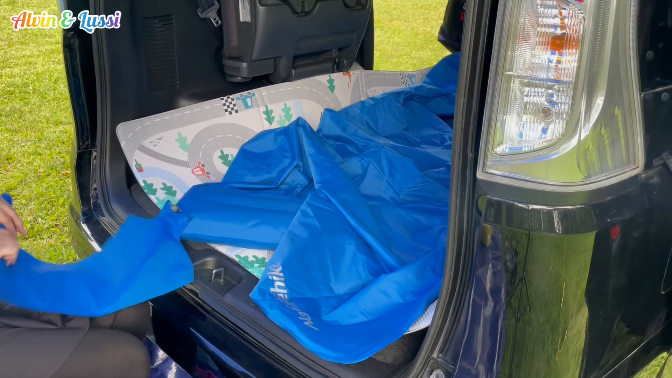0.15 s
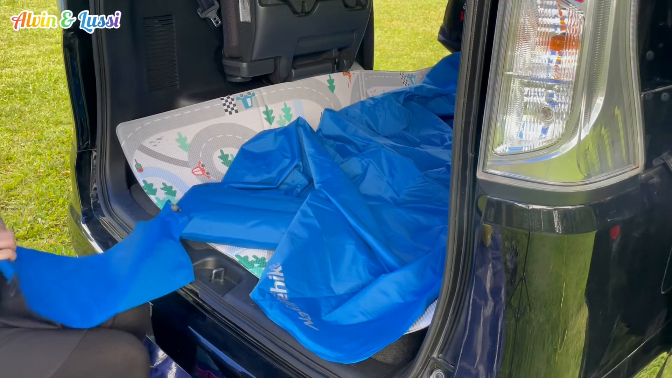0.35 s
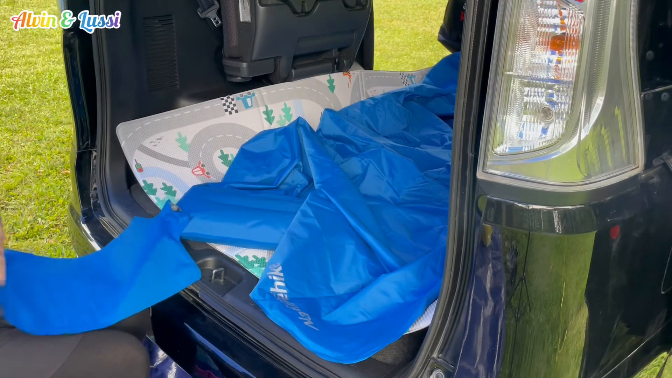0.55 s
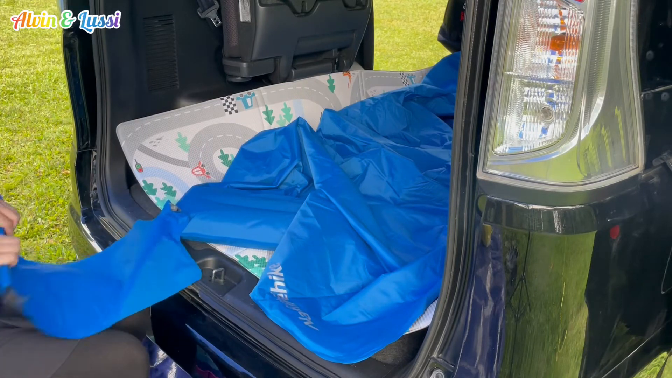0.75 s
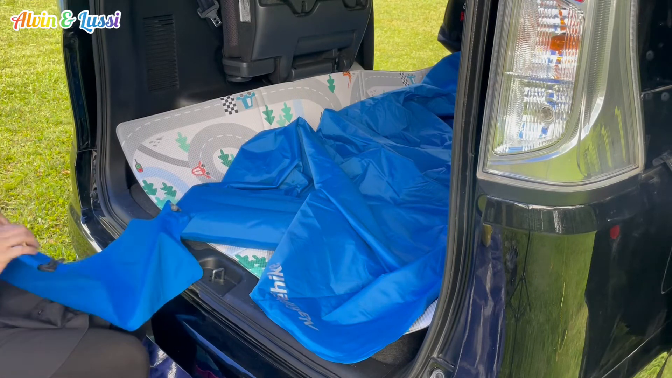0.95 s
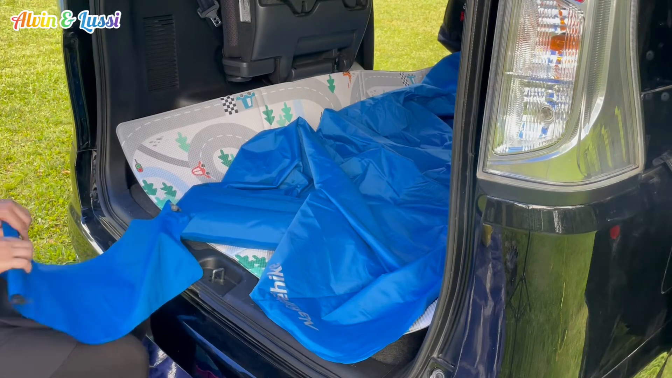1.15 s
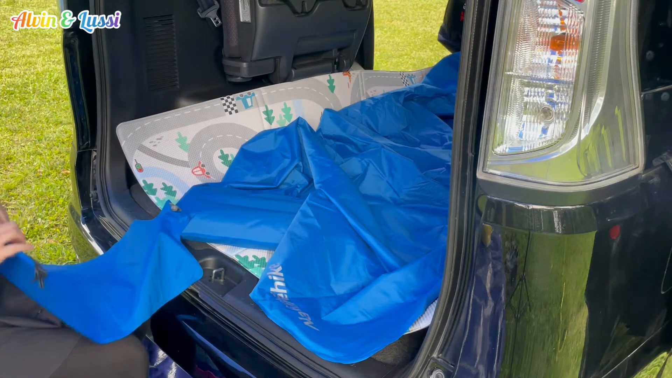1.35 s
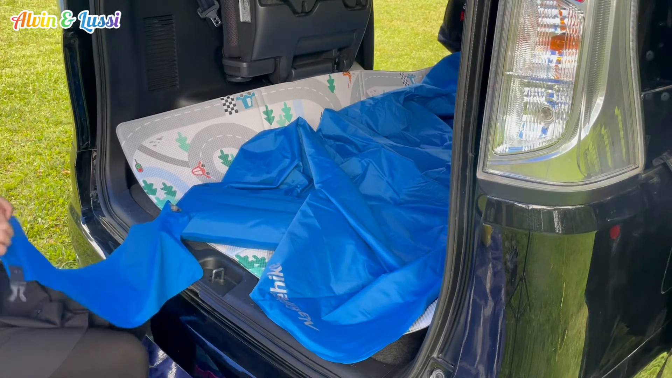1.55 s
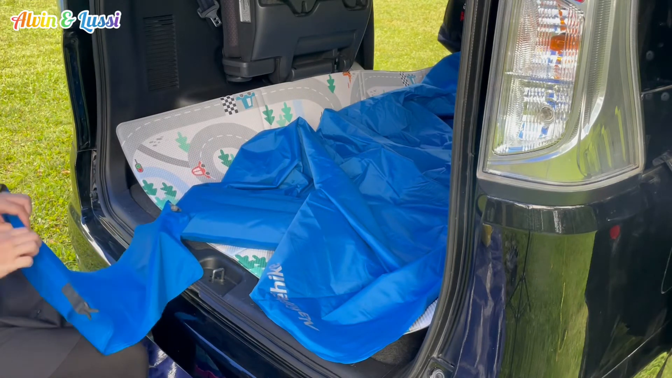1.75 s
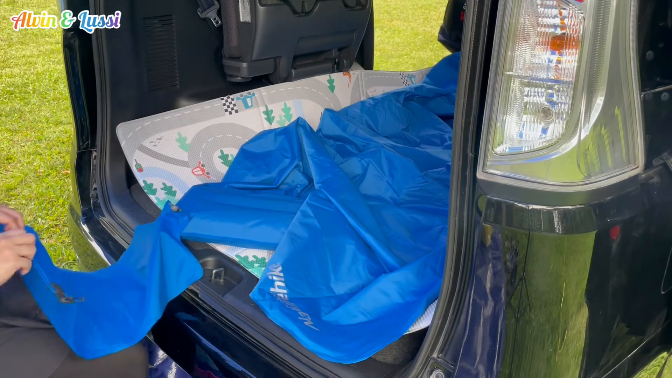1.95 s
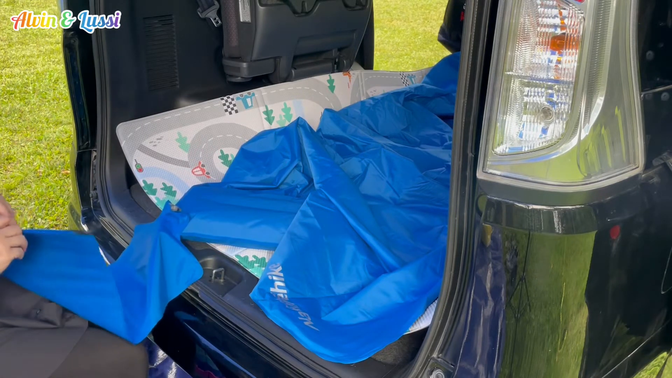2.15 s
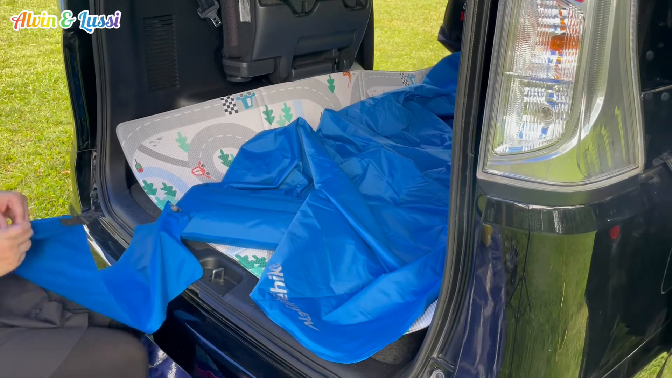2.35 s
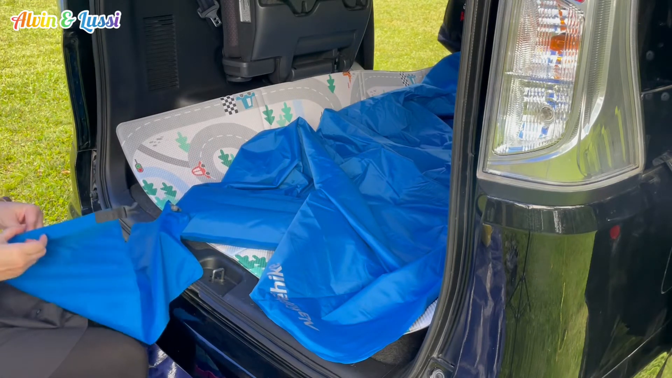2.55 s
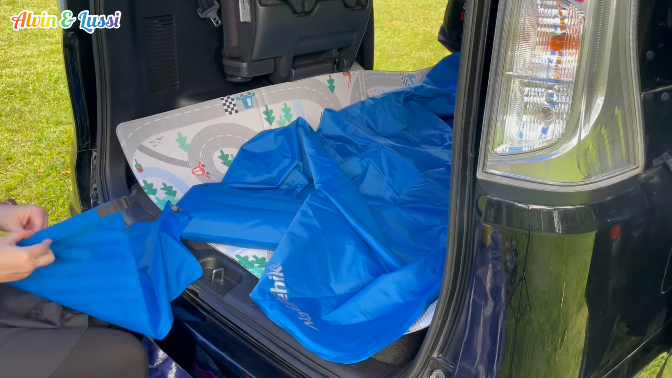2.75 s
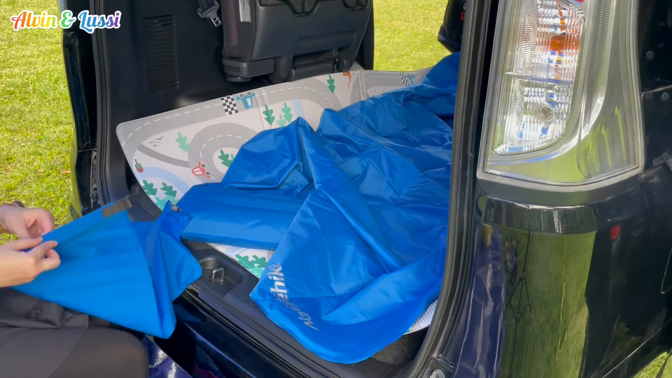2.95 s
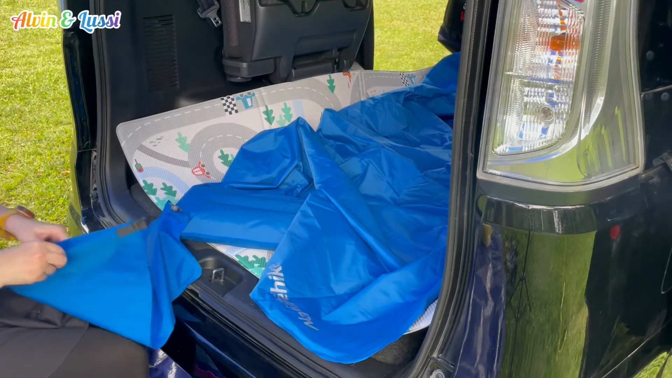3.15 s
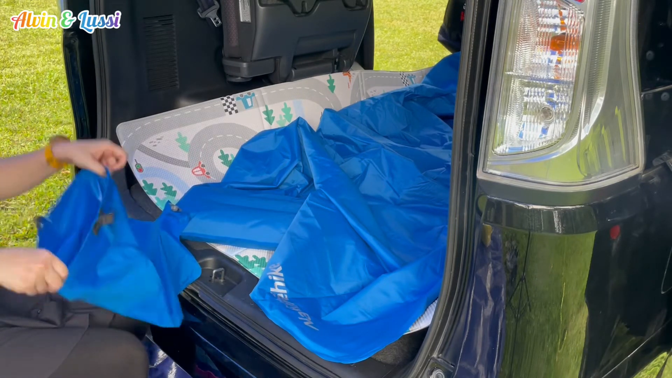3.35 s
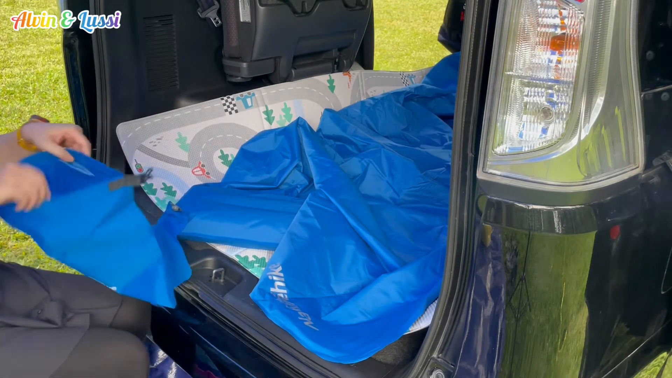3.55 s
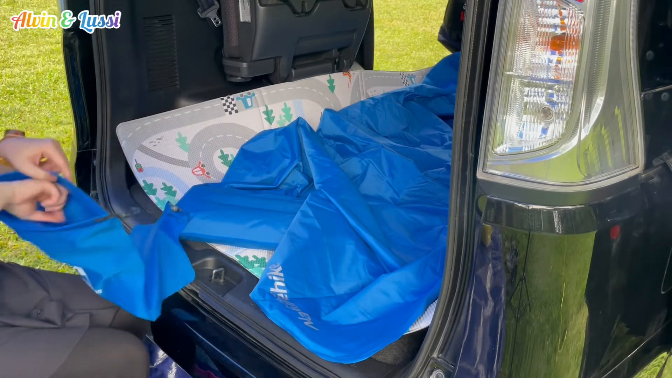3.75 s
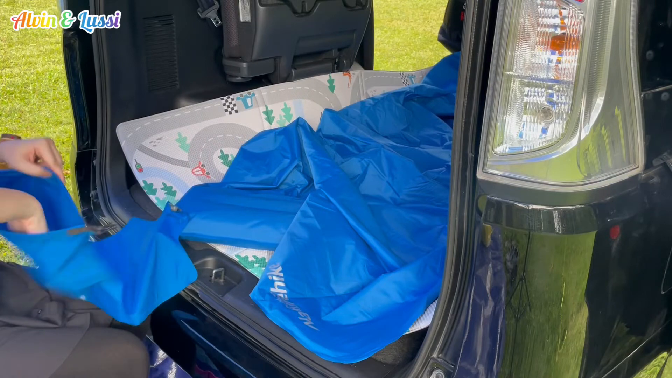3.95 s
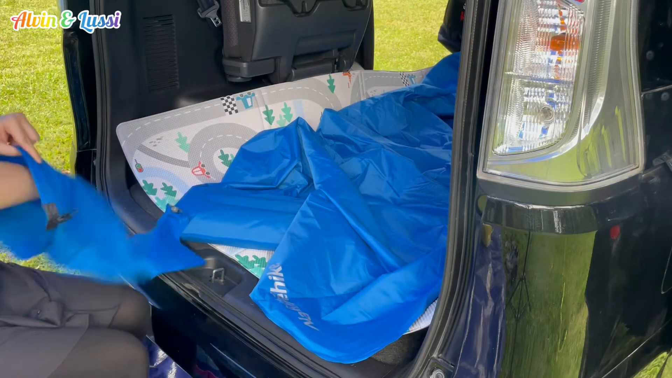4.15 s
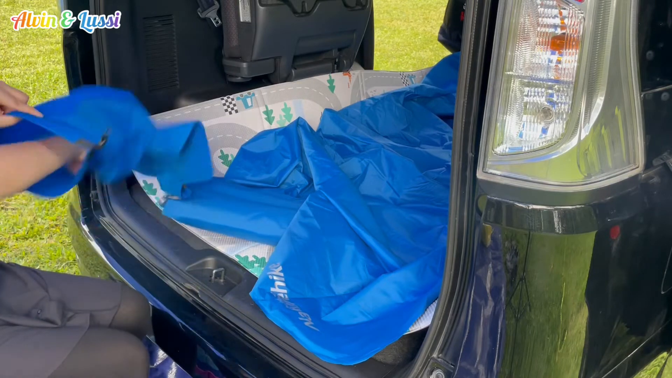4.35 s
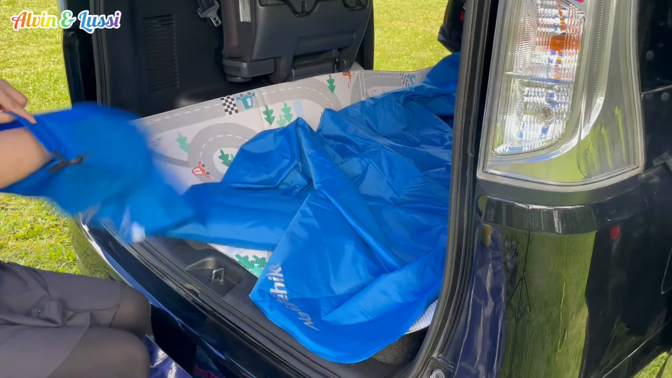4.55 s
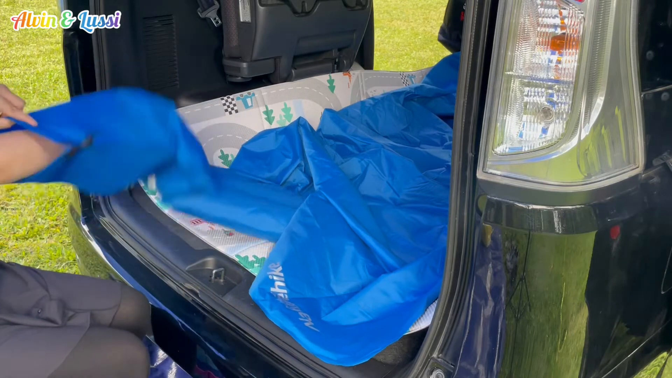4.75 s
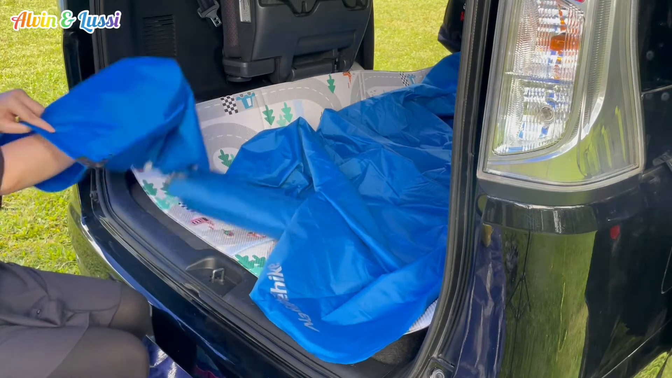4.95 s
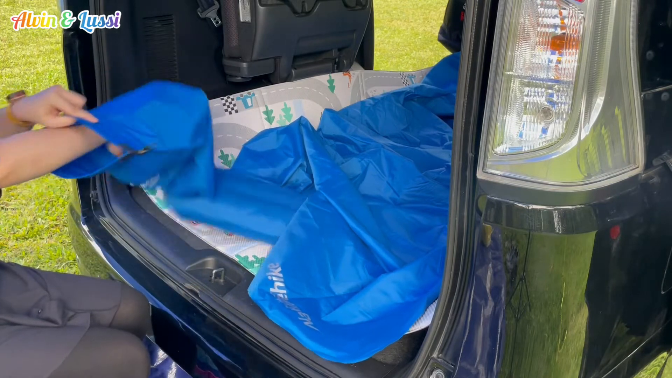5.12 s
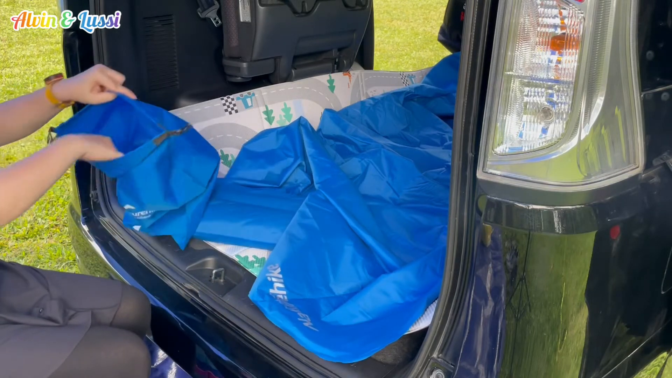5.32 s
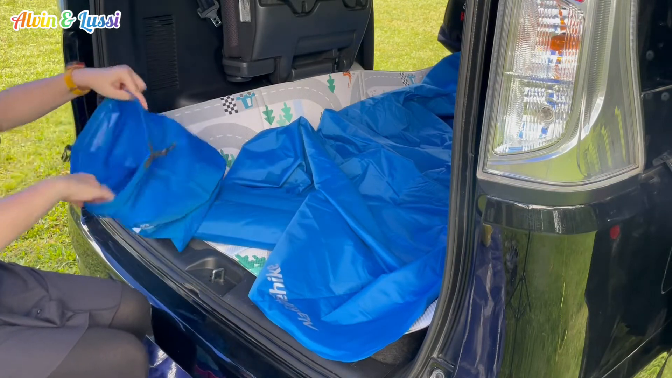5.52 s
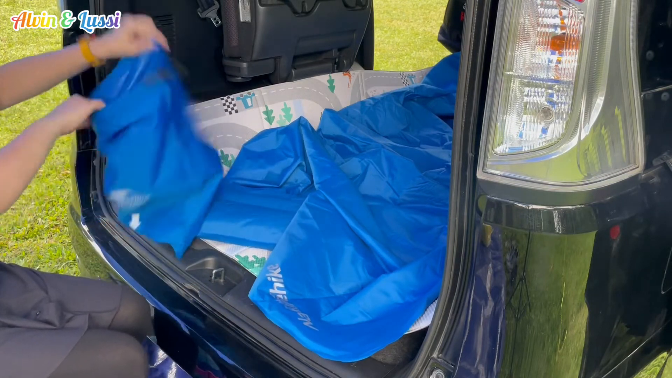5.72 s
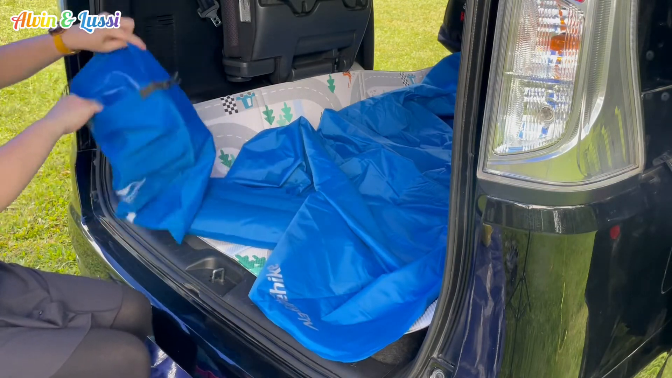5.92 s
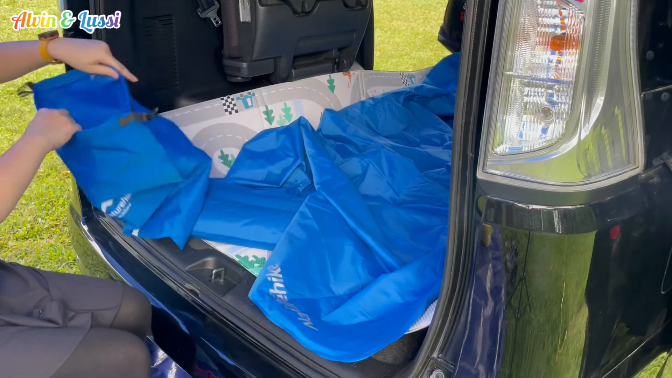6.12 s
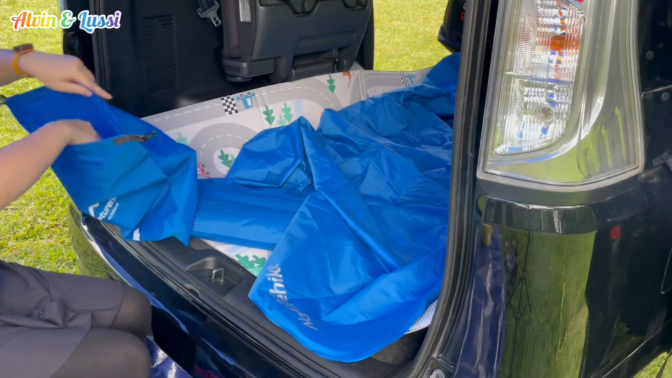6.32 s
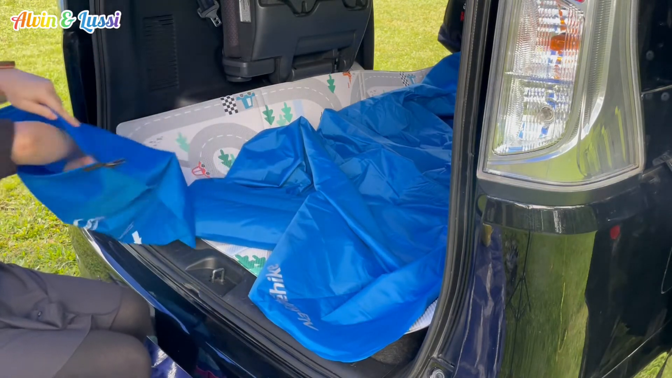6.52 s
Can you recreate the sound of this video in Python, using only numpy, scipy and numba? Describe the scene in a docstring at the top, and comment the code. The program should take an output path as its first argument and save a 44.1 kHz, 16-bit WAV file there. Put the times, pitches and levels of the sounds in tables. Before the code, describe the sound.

Thin coated nylon rustles, snaps and crinkles in uneven bursts as hands tug it, growing rougher, while meadow insects shrill and distant birds call.

```python
"""A metre from a phone, hands unfold a thin nylon pad at the open boot of a car on a summer meadow.
Throughout, insects shrill (noise throbbing with the wings) and far traffic rumbles (low noise).
The cloth snaps at once: creases buckle and ring small patches (fading sines), and birds call (gliding tones).
Chirps follow from 0.9 s and a grasshopper near 2 s while the cloth is calmer; from 3.2 s it jerks harder,
with squeaks and cracks, is loudest near 4.8 s, then chirps return and more hard jerks come near 6.6 s."""
import sys
import numpy as np
from scipy import signal
from scipy.fft import rfft, irfft
from scipy.io import wavfile
from scipy.ndimage import uniform_filter1d
from numba import njit

SR = 44100
rng = np.random.default_rng(int(sys.argv[2]) if len(sys.argv) > 2 else 0)


def wav_record(signal):
    """Record a signal, one row per channel, as 16-bit PCM in the file named by sys.argv[1]."""
    frames = np.transpose(np.atleast_2d(signal))
    bounded = np.clip(frames, -1, 1)
    # unit amplitude maps onto the largest positive 16-bit level
    quanta = np.round(bounded * 32767).astype(np.int16)
    wavfile.write(sys.argv[1], SR, quanta)


N = 294584  # length in samples

# jerks of the cloth: t/s, level/dB, patch pitch f/Hz, flap re level/dB, rasp re level/dB, fall by 60 dB/s
JERKS = [(0.055, -41, 1130, -23, -37, 0.26), (0.157, -47, 617, -20, -23, 0.038),
         (0.222, -39, 580, -27, -7, 0.035), (0.242, -41.5, 610, -26, -9.5, 0.25),
         (0.273, -45, 1050, -20, -15, .04), (0.296, -34, 896, -28, -2, 0.074),
         (0.466, -41, 584, -7, -16, 0.067), (0.482, -38.5, 560, -13, -17, 0.082),
         (0.506, -30.5, 487, -5, -13.5, 0.25), (0.558, -46.5, 500, -8, -0.5, 0.19),
         (0.64, -36, 517, -7, -10, 0.04), (0.709, -41, 675, -22, -23, 0.11),
         (0.766, -43, 627, -15, -15, .04), (1.01, -35.5, 540, -2, -12, 0.086),
         (1.068, -64.5, 550, -12, 11.5, 0.19), (1.12, -49, 600, -15, -20, 0.035),
         (1.204, -42.5, 580, -7, -2.5, 0.044), (1.217, -43, 620, -12, -18, 0.044),
         (1.265, -44, 475, -16, -10, 0.19), (1.328, -32, 567, -6, -4, 0.085),
         (1.497, -52, 1150, -15, -20, .06), (1.596, -60.5, 398, -14, 11, 0.13),
         (1.689, -42.5, 557, -11, -13, 0.19), (1.748, -48, 600, -12, -18, .09),
         (1.968, -47, 590, -16, -2, 0.18), (1.993, -45, 2190, -18, 0, 0.72),
         (2.075, -36.5, 840, -24, -15, 0.11), (2.095, -43, 600, -32, -14, 0.14),
         (2.124, -31, 740, -25, -7.5, 0.084), (2.324, -45.5, 575, -11, -17, 0.21),
         (2.361, -54.5, 900, -10, 0, 0.32), (2.94, -60.5, 930, -4, 1, 0.22),
         (3.091, -53, 445, -13, -10, 0.21), (3.144, -40.5, 401, -10, -15, 0.093),
         (3.205, -41, 410, -1, 3, 0.7), (3.243, -29, 800, -8, -18, .08),
         (3.2494, -23, 1110, 1.5, -23, 0.054), (3.282, -33, 422, -14, -17, 0.16),
         (3.329, -31.5, 940, -28, -39, 0.069), (3.349, -38, 1000, -20, -29, 0.035),
         (3.414, -34.5, 1030, -23, -38.5, 0.069), (3.496, -41.5, 440, -8, -8, 0.51),
         (3.538, -36.5, 780, -20, -14, 0.16), (3.573, -34, 800, -21, -1, 0.031),
         (3.595, -47, 360, -24, 8, 0.23), (3.747, -37.5, 714, 5.5, -10.5, 0.097),
         (3.788, -33, 756, -5, -13, 0.023), (3.921, -27, 765, -10, -35, 0.14),
         (3.933, -23.5, 760, -27, -16.5, 0.24), (3.988, -29.5, 960, -15, -17, 0.055),
         (4.023, -32.5, 590, -19, -37, 0.038), (4.065, -36.5, 600, -2, -34, 0.31),
         (4.11, -24, 773, -10, -20, 0.14), (4.122, -30.5, 1110, -13, -7, 0.12),
         (4.196, -36, 800, -17, -9, .1), (4.207, -27.5, 1050, -43, -6, 0.11),
         (4.252, -37, 400, 4, -2, 0.16), (4.316, -34.5, 655, -17, 10, 0.039),
         (4.343, -19, 780, -30, -16.5, 0.086), (4.358, -25, 700, -25, -16, 0.079),
         (4.392, -30, 727, -19, -7, 0.046), (4.431, -32.5, 426, -11, -16, 0.13),
         (4.452, -19.5, 1210, -20, -8, 0.12), (4.482, -40, 600, -10, -20, .05),
         (4.493, -19.5, 1100, -14, -13, 0.15), (4.514, -28, 494, -3, -15, 0.094),
         (4.537, -19, 900, -8, -22, 0.045), (4.557, -16, 448, -18, -12.5, 0.15),
         (4.568, -22, 594, -17, -9, 0.055), (4.689, -22, 990, -36, -16, 0.1),
         (4.735, -34.5, 900, -15, -9, .06), (4.764, -26, 437, -8, -18, 0.02),
         (4.799, -26, 332, 5, -16, 0.21), (4.811, -44, 800, -7, -20, 0.049),
         (4.822, -29, 590, -14, -9, 0.12), (4.8453, -13.5, 429, 4, -12, 0.062),
         (4.909, -38.5, 950, -15, -13, 0.091), (4.977, -36, 740, -28, -18, 0.031),
         (5.016, -40, 800, -15, -12, .08), (5.031, -35, 784, -25, -10, 0.21),
         (5.121, -39, 730, -19, -20, 0.14), (5.141, -36.5, 1330, 3.5, -13, 0.12),
         (5.164, -36.5, 506, 2, -9, 0.099), (5.173, -45, 490, -15, 2, 0.22),
         (5.2, -43, 624, -14, -3.5, 0.14), (5.23, -37, 288, -24, -10, 0.11),
         (5.255, -33, 785, -16, -35, 0.06), (5.294, -35.5, 1490, -17, -25, 0.018),
         (5.345, -43, 1500, -18, -5, 0.068), (5.437, -49, 1170, -15, -10, 0.19),
         (5.514, -38.5, 620, -25, -5.5, 0.1), (5.527, -34, 1500, -25, -18, 0.027),
         (5.584, -39.5, 326, -19, 3, 0.11), (5.623, -38, 606, 1, -37, 0.23),
         (5.676, -26, 283, -4, -32, 0.06), (5.725, -21, 990, -1, -10, 0.16),
         (5.736, -34, 503, -10, -1, 0.098), (5.787, -36, 595, -12, -16, 0.049),
         (5.831, -31.5, 666, 0.5, -12, 0.19), (5.908, -29, 760, -15, -33, 0.087),
         (6.014, -49.5, 288, 21, -37, 0.14), (6.033, -34, 645, -4, -38, 0.11),
         (6.055, -37, 317, -11, -22, 0.048), (6.25, -45, 1210, -20, -14, 0.059),
         (6.277, -44, 640, -12, -11, 0.088), (6.3, -41.5, 730, -25, -17, 0.71),
         (6.365, -35.5, 770, 0, -12, 0.11), (6.448, -34, 614, -26, -22, 0.051),
         (6.515, -40.5, 684, 4, -20, 0.18), (6.591, -28, 427, -7, -10, 0.057),
         (6.603, -24.5, 440, -6, -12.5, 0.27), (6.644, -23, 526, -12, -20, 0.044),
         (6.661, -35, 1500, -15, -8, .04), (6.67, -33, 700, -12, -15, .04)]
# where the hands work and how fine the rasp is: t/s, left minus right/dB, off-axis level/dB,
# finest sizzle re rasp/dB, pocket re crinkle/dB
HAND_PLACES = [(0, 3.5, 4, -7, -0.5), (1.5, 5.5, 5, -0.5, -0.5), (2.2, 4.5, 6, -33, 0),
               (3.0, 5.5, -1.5, -5, -6), (4.0, 5.5, -3, -9, -9), (4.3, 5, -6, -14, -9),
               (5.2, 4, -8.5, -5, -8), (5.6, 5.5, -6.5, -27, -10), (6.68, 4, -7, -11, -3)]


def undb(db):
    """Gain of a dB value."""
    return 10 ** (np.asarray(db) / 20)


def level(x, db):
    """Scaled to an rms level."""
    return x * undb(db) / np.sqrt(np.mean(x ** 2))


def curve(rows):
    """Draws lines between the (t/s, ..) rows and gives each column one value a sample."""
    s, *columns = np.transpose(rows)
    return [np.interp(np.arange(N) / SR, s, c) for c in columns]


def over(table, hz):
    """Reads (f/Hz, value) points on a log axis."""
    f, v = np.transpose(table)
    return np.interp(np.log(hz + 1), np.log(f), v)


def band(x, hz, width_hz):
    """Keeps a bell-shaped band of pitches."""
    f = np.fft.rfftfreq(x.shape[-1], 1 / SR)
    bell = np.exp(-.5 * ((f - hz) / width_hz * 2) ** 2)
    return irfft(rfft(x) * bell, x.shape[-1])


def walk(rate):
    """Random values, a new one each 1 / rate s, smoothed twice; spread near 1."""
    k = int(SR / rate)
    steps = np.repeat(rng.standard_normal(N // k + 1), k)
    return 1.03 * uniform_filter1d(uniform_filter1d(steps, k), k)[:N]


def echo(x, t60):
    """A blurred tail of fading noise, different left and right, about as loud as its input."""
    t = np.arange(int(t60 * SR)) / SR
    fade = undb(-60 * t / t60) * np.minimum(t / 0.0026, 1)
    tail = rng.standard_normal((2, SR * 2))[:, :len(t)] * fade
    return signal.fftconvolve(x[None], tail / np.sqrt(np.sum(tail[0] ** 2)), axes=1)[:, :N]


@njit
def rings(n, start, step, cycles, size):
    """Damped sines that fall 60 dB in three times the given cycles."""
    out = np.zeros(n)
    for i in range(len(start)):
        fall = np.log(1000) * step[i] / (6 * np.pi * cycles)
        # multiplying by p turns the pointer z one sample on and shrinks it
        p, z = np.exp(1j * step[i] - fall), size[i] + 0j
        for k in range(start[i], min(n, start[i] + int(5.8 / fall))):
            out[k] += z.imag
            z *= p
    return out


def ring(s, db, hz, cycles):
    """One damped sine for each row."""
    return rings(N, (s * SR).astype(np.int64), 2 * np.pi * hz / SR, cycles, undb(db))


def call(shape, s, stretch, db):
    """One gliding whistled note, drawn by (time, f/Hz, level/dB) points and stretched in time."""
    when, hz, shape_db = np.transpose(shape)
    t = np.arange(int(when[-1] * stretch * SR)) / SR / stretch
    wave = np.sqrt(2) * np.sin(2 * np.pi * np.cumsum(np.interp(t, when, hz)) / SR)
    out, i = np.zeros(N), int(s * SR)
    out[i:i + len(t)] = (wave * undb(db + np.interp(t, when, shape_db)))[:N - i]
    return out


def cloth():
    """All sounds of the cloth ring in the boot and are heard unequally left and right."""
    near = crinkling() + pops() + cracks()
    near = near + (1 + 0.22 * walk(820)) * squeaks()
    near = boot_hollows(near)
    middle = band(near, 1640.0, 6900.0) - band(near, 0., 683.0)
    pan, off_axis = curve(HAND_PLACES)[:2]
    # a source off the axis is heard out of step and unequal left and right, most in the middle range
    skew = undb(off_axis) * band(np.imag(signal.hilbert(middle)), 310.0, 2100.0)
    sides = undb(np.array([pan, -pan]) / 2) - 1
    direct = near + sides * middle + np.array([skew, -skew])
    boot_t60_s, boot_db = 0.055, -4.5
    return direct + undb(boot_db) * echo(middle, boot_t60_s)


def crinkling():
    """The pull sets a bed of buckling creases, and each jerk adds a fading burst of more."""
    # cloth being pulled: t/s, crinkle level/dB, slack flap re crinkle/dB, fine rasp re crinkle/dB
    pull = [(0.0, -70.5, -3, -1), (0.48, -68, -0.5, -3.5), (0.65, -59, -8, -4.5), (0.85, -68.5, -2, -3),
            (1.75, -69.5, 2, -5), (2.17, -63.5, 2, -8.5), (2.3, -82.5, 12.5, -3), (2.62, -77.5, 11, -5),
            (3.03, -81.5, 8.5, -1), (3.19, -60, -1, -10.5), (3.42, -67.5, 3.5, -34),
            (3.76, -61, -6.5, -2.5), (3.9, -69, 5.5, -9), (4.13, -52, -7, -9.5), (4.3, -47.5, -2.5, -7.5),
            (4.41, -52, 0, -11), (4.45, -47, 5, -4.5), (4.62, -56.5, 6, -7.5), (4.75, -51, -8, -9.5),
            (4.84, -45, -6, -12), (4.92, -51.5, 0, -9.5), (5.1, -62.5, -1, -4), (5.18, -60, -1, -1.5),
            (5.26, -58.5, -6, -8), (5.29, -67, 8, 0.5), (5.42, -72.5, 4, -0.5), (5.5, -67, 4, -2),
            (5.64, -49, -5.5, -14.5), (5.72, -45, -21, -12.5), (5.8, -60, -1, -2.5), (6.0, -64, 4, -5),
            (6.1, -58.5, 2, -11.5), (6.21, -71, 1.5, -4), (6.33, -61, -6, -6.5), (6.42, -75, 8, -2.5),
            (6.57, -61.5, 7, -1.5), (6.62, -43, -1, -15), (6.68, -49, 0, -10)]
    # patch sizes, slack to fine: lowest f/Hz, highest f/Hz, creases per s, cycles rung, size scatter/dB
    patches = [(125, 446, 900, 3.1, 1.5), (443, 2220, 2600, 2.8, 3), (2020, 3730, 2500, 7.3, 3),
               (3804, 6980, 4000, 13, 1.5), (6500, 10600, 15000, 1.65, 3)]
    # a pocket of trapped air that knocks softly; columns as for the patches
    pocket = (494, 700, 300, 6.9, 3.04)
    # share of the rasp above its middle: t/s, level re rasp/dB
    bright = [(0, -0.5), (.5, -0.5), (1.3, 1), (2.0, -6), (2.4, 0.5), (2.95, 9), (3.15, -2.5), (3.6, -1.5),
              (3.9, -0.5), (4.3, -4), (4.55, -3.5), (4.85, -4.5), (5.06, 0), (5.15, -5.5), (5.28, 2),
              (5.55, -3), (5.72, 1.5), (6.0, -7), (6.29, 4), (6.45, 0.5), (6.68, -6)]
    burst_db = -14.5  # creases set off by a jerk, re its level
    crinkle, flap, rasp = curve(pull)
    sizzle, hollow = curve(HAND_PLACES)[2:]
    stutter = 3.05 * walk(45)  # the cloth sticks and slips, in dB
    drive = undb(crinkle + stutter + np.array([flap, 0 * flap, rasp, rasp, rasp]))
    t = np.arange(SR // 3) / SR
    rise_s = np.array([[.005], [.003], [.0008], [.0008], [.0004]])  # fine patches speak first
    rise = np.minimum(t / rise_s, 1)
    for s, db, _, low, high, t60 in JERKS:
        i = int(s * SR)
        # the last row, the sizzle, follows the rasp
        tilt = np.array([[low], [0], [high], [high], [0.93 * high + 1.7]])
        burst = rise * undb(db + burst_db + tilt - 60 * t / max(t60, .02))
        drive[:, i:i + len(t)] += burst[:, :N - i]
    drive[3:] *= undb([curve(bright)[0], sizzle])
    bed = sum(gain * creases(*patch) for gain, patch in zip(drive, patches))
    return bed + undb(crinkle + hollow + stutter) * creases(*pocket)


def creases(lo_hz, hi_hz, rate, cycles, scatter_db):
    """Creases buckle at random; each rings a patch of its own size."""
    # how loud the cloth rings by pitch: f/Hz, level per Hz/dB
    cloth_tone = [(50, -16.5), (90, 0), (200, -0.5), (400, 3.5), (700, 1.5), (1300, -1), (1750, -10),
                  (2400, -15), (4400, -19.5), (8000, -15.5), (12500, -11), (15500, -19)]
    # never more than 80000 creases in all
    when, where, sign, big = rng.random((80000, 4))[:int(rate * N / SR)].T
    hz = lo_hz * (hi_hz / lo_hz) ** where
    # small patches ring shorter and share a wider band, hence the factor hz
    loud = hz * undb(over(cloth_tone, hz) - scatter_db * np.log(big + 1e-4))
    size = np.sign(sign - .5) * loud
    return level(rings(N, (when * N).astype(np.int64), 2 * np.pi * hz / SR, cycles, size), 0)


def pops():
    """Each jerk rings one large patch with a soft push: the ring swells first."""
    s, db, hz = np.transpose(JERKS)[:3]
    return ring(s, db - 5.5, hz, 6.55) - ring(s, db + 0.5, hz, 0.45)


def cracks():
    """A stiff crease cracks: a short bright ring, with others above and after it; a whip hardly rings."""
    # a stiff crease cracks: t/s, level before the trims below/dB, f/Hz
    ticks = [(1.3273, -43, 3640), (1.992, -36.5, 2520), (2.0758, -42, 3020), (3.2018, -53, 4000),
             (3.2867, -40, 5450), (3.575, -37.5, 4500), (3.5963, -28.5, 4670), (3.79, -42.5, 3060),
             (3.918, -45.5, 2630), (4.1994, -34, 2350), (4.254, -35, 2000), (4.263, -25, 2350),
             (4.3164, -52, 2220), (4.3425, -46, 2500), (4.392, -42, 2260), (4.4337, -42, 2630),
             (4.4555, -26, 2490), (4.557, -24, 2400), (4.69, -48, 2500), (4.787, -37, 2820),
             (4.875, -37, 2300), (4.846, -32, 2410), (5.0603, -42, 2520), (5.13, -43, 2300),
             (5.16, -44, 2900), (5.176, -44, 2400), (5.184, -46, 2660), (5.201, -46, 2050),
             (5.215, -47, 3100), (5.246, -46, 2900), (5.236, -43, 2500), (5.5857, -39, 4200),
             (5.7064, -31.5, 2600), (5.7364, -24.5, 5600), (5.7616, -29.5, 2730), (6.5897, -51, 2420)]
    # the cloth is whipped taut and throws a short pulse of air: t/s, level/dB, f/Hz
    whips = [(3.9365, -17, 696), (3.942, -22, 740), (4.341, -38, 900), (4.558, -16, 700),
             (4.8473, -14, 1100), (4.8499, -8, 860), (5.68, -17.5, 293), (6.6078, -16.5, 402),
             (6.627, -15.5, 430)]
    s, db, hz = np.transpose(ticks)
    bright = ring(s, db + 5, hz, 2.5) + ring(s, db - 1, 2.6 * hz, 3.)
    after = ring(s + .0012, db - 3, .75 * hz, 4.) + ring(s + .0027, db - 6, 1.5 * hz, 5.)
    return bright + after + ring(*np.transpose(whips), 0.78)


def squeaks():
    """A nail skips on the coating: short gliding tones that swell and fade."""
    # t/s, length/s, first f/Hz, last f/Hz, level/dB
    skips = [(3.2, 0.008, 4320, 3700, -44.5), (3.209, 0.0067, 2930, 2520, -47),
             (3.223, 0.006, 2870, 2500, -52), (3.226, .007, 2700, 2500, -47),
             (3.235, .009, 2640, 2300, -49), (3.271, 0.015, 5440, 5200, -55),
             (3.282, 0.011, 5420, 5500, -46)]
    out = 0
    for s, length, a, b, db in skips:
        glide = [(0, a, -20), (.4, a + .4 * (b - a), 0), (.7, a + .7 * (b - a), -2), (1, b, -20)]
        out = out + call(glide, s, length, db)
    return out


def boot_hollows(near):
    """Hollows of the boot ring along, each strongest at its own pitch."""
    # f/Hz, width/Hz, level re direct sound/dB
    hollows = [(310.5, 19, -13), (448, 15, -16), (621, 20, -12), (714, 36, -10.5), (960, 31, -13.5),
               (1171, 17, -15.5), (1444, 43, -4), (2450, 58, -17), (3260, 24, -12)]
    f = np.fft.rfftfreq(N, 1 / SR)
    ringing = sum(undb(db) / (1 + 2j * (f - hz) / w) for hz, w, db in hollows)
    return irfft(rfft(near) * (1 + ringing), N)


def insects():
    """A steady chorus, a thin trill, a grasshopper for a moment, and a bush cricket in short chirps."""
    # steady shrilling: f/Hz, width/Hz, level/dB, wing strokes per s, throb depth 0-1
    chorus_rows = [(10310, 1060, -66, 112, 0.1), (11040, 800, -71.5, 120, 0.2), (9430, 230, -80.5, 74, 0.2)]
    # thin trill: t/s, level before a 1 dB cut/dB
    trill_db = [(0, -76), (.5, -75), (1.3, -75), (1.7, -72), (2.1, -76), (2.6, -75), (3.1, -75), (4.0, -74),
                (5.0, -79), (6.68, -82)]
    # grasshopper: t/s, level of its main band/dB
    hopper_db = [(1.93, -100), (1.99, -74), (2.55, -71), (2.8, -75), (2.87, -100)]
    # bush cricket, bouts of chirps: first t/s, chirps, first gap/s, each gap longer by/s, level/dB
    bouts = [(.87, 11, .185, .0043, -63), (5.045, 9, .197, 0, -64)]
    t = np.arange(N) / SR
    chorus = sum(undb(db + 0.44 * walk(4.3)) * shrill(hz, w, rate, depth)
                 for hz, w, db, rate, depth in chorus_rows)
    trill = undb(curve(trill_db)[0] - 1 + 2 * walk(6)) * shrill(4750., 480., 60., .15)
    wings = shrill(8540., 200., 45., .3) + .75 * shrill(8130., 170., 45., .3)
    wings = wings + .4 * shrill(8850., 200., 45., .3)
    hopper = undb(curve(hopper_db)[0] + 2.5 * walk(30)) * wings
    gate = 0
    for first, count, gap, longer, db in bouts:
        starts = first + np.cumsum(gap + longer * np.arange(-1, count - 1)) - gap + longer
        for s in starts:
            gate = gate + undb(db) * np.exp(-((t - s) / 0.035) ** 4)
    chirps = gate * undb(1.5 * walk(9)) * shrill(7210., 400., 200., .5)
    near = chorus + trill + hopper + chirps
    return near + undb(-10.5) * band(echo(near, 0.18), 9600.0, 7000.)


def shrill(hz, width_hz, rate, depth):
    """Scraped wings: noise in the wing resonance, throbbing once a stroke."""
    stroke = np.cos(2 * np.pi * np.cumsum(rate * (1 + 0.0012 * walk(4.8))) / SR)
    return level(band(rng.standard_normal(N), hz, width_hz) * (1 + depth * stroke), 0)


def birds():
    """Far birds whistle gliding notes, made unsteady by the air and smeared by the trees."""
    # whistle shape: t from start before stretching/s, f/Hz, level/dB
    whistle = [(0, 2150, -14), (.015, 2400, -6), (.03, 2680, -4), (.055, 2700, -5), (.065, 2350, -1),
               (.075, 2100, -3), (.105, 2070, -6), (.13, 2100, -25)]
    # whistles: t/s, level/dB, extra level of the opening/dB
    whistle_calls = [(0.735, -62.5, -16), (1.675, -63, 0), (2.738, -64, 0), (3.601, -65, -6)]
    # falling shape: t from start before stretching/s, share of the drop still to come, level/dB
    fall = [(0, 1, -8), (.014, .5, -2), (.03, .1, 0), (.045, 0, -2), (.06, .03, -5), (.075, .04, -25)]
    # falling calls: t/s, first f/Hz, last f/Hz, stretch, level/dB, hoarseness 0-1
    fall_calls = [(2.435, 5900, 4650, 3.2, -66, .55), (.83, 5800, 5100, 2.2, -70, .7),
                  (1.06, 5800, 5150, 2.2, -70, .7), (2.655, 5750, 4850, 3., -67, .6),
                  (2.885, 5750, 4800, 2.6, -65, .55), (3.11, 5700, 4900, 2.4, -70, .7),
                  (3.465, 5700, 5200, 2., -65, .5), (5.325, 5700, 4850, 2.4, -62.5, .68),
                  (5.565, 5700, 4900, 2.4, -64, .7), (5.815, 5650, 4800, 2.5, -63, .7),
                  (5.31, 4000, 3200, 1.1, -62.5, .45), (6.083, 4500, 3220, 1.1, -64, .48),
                  (6.472, 4000, 3250, 1., -63.5, .55)]
    # thin high note: t from start before stretching/s, f/Hz, level/dB
    seep = [(0, 5750, -15), (.03, 5850, 0), (.1, 6050, -3), (.23, 6200, -20)]
    # thin high notes: t/s, level/dB
    seep_calls = [(6.03, -72), (6.425, -68)]
    trees_t60_s, trees_db = 1.0, -.5
    hoarse, waver = walk(900), walk(150)
    falls = 0
    for s, a, b, stretch, db, rough in fall_calls:
        shape = [(t, b + share * (a - b), g) for t, share, g in fall]
        falls = falls + call(shape, s, stretch, db) * (1 - rough + rough * hoarse)
    seeps = (0.48 + 0.36 * waver + 0.57 * hoarse) * sum(call(seep, s, 0.89, db) for s, db in seep_calls)
    whistles = 0
    for s, db, opening in whistle_calls:
        shape = [(t, f, g + opening * (t < .03)) for t, f, g in whistle]
        whistles = whistles + call(shape, s, .93, db)
    song = (1 + .35 * waver + .4 * hoarse) * whistles + falls + seeps
    return song + undb(trees_db) * echo(song, trees_t60_s)


def rumble():
    """Low noise for a far road that swells and sinks, and for puffs of air pushed by the slack cloth."""
    # far road: t/s, level/dB
    road = [(0, -59.5), (2.4, -57.5), (2.8, -55), (3.7, -55.5), (4.5, -55), (6.68, -61)]
    # puffs: t at the middle/s, level/dB
    puff_rows = [(3.29, -51), (3.78, -69), (3.94, -47.5), (4.1, -45.5), (4.48, -49), (4.85, -42),
                 (5.21, -63), (5.71, -43), (6.03, -47), (6.36, -56), (6.66, -43)]
    puff_s = 0.036  # from the middle to where the puff has sunk to 1/e
    t = np.arange(N) / SR
    puffs = sum(undb(db) * np.exp(-((t - s) / puff_s) ** 2) for s, db in puff_rows)
    low_noise = level(band(rng.standard_normal(N), 62.2, 47.0), 0)
    return (undb(curve(road)[0] + 1.25 * walk(4.9)) + puffs) * low_noise


def meadow():
    """Far traffic and air: noise in octave bands that swell and flicker, alike left and right by band."""
    # colour of the noise: f/Hz, relative level per Hz/dB
    colour = [(25, 7), (60, -6.5), (140, 1), (230, -7), (420, -21), (850, -23), (2400, -48), (6000, -29.5),
              (9000, -25), (11800, -50), (12300, -70), (13300, -79), (14300, -36), (15400, -29)]
    # f/Hz, likeness of left and right 0-1
    likeness = [(60, 0.38), (150, 0.9), (300, 0.13), (650, .05), (1400, 0.13), (2500, 0.14), (6000, 1),
                (11000, 0.99)]
    meadow_db = -59
    f, out, swell = np.fft.rfftfreq(N, 1 / SR), 0, walk(0.28)
    alike = np.clip(over(likeness, f), 0, 1)
    noise = rfft(rng.standard_normal((2, N))) * undb(over(colour, f))
    mid, side = noise * np.sqrt([1 + alike, 1 - alike])
    for hz in 30 * 2. ** np.arange(10):
        share = np.clip(1 - abs(np.log2((f + 1) / hz)), 0, 1)  # neighbouring bands overlap
        octave = irfft(share * np.array([mid + side, mid - side]), N)
        out = out + undb(0.27 * swell + 3.4 * walk(11)) * octave
    return level(out, meadow_db)


def scene():
    """All sources at the phone."""
    return cloth() + meadow() + rumble() + insects() + birds()


def record(dry):
    """Left shifts against right in steps up the treble, the right has more bass; both ends are cut."""
    # the stereo image shifts left against right in steps up the treble: f/Hz, left's lead/half turns
    left_lead = [(0, 0), (5900, .04), (6700, 1), (8100, 1), (9900, 2), (12400, 2), (13200, 3), (15100, 3),
                 (15900, 3.25), (22050, 3.25)]
    bass_cut_hz, top_hz = 64.4, 15900
    bass_lean = .055  # each side's share of the lean to the right, in nepers (1 neper = 8.7 dB)
    f, turns = np.fft.rfftfreq(N, 1 / SR), np.transpose(left_lead)
    lead = 1j * np.pi / 2 * np.interp(f, *turns) - bass_lean / (1 + (f / 350) ** 4)
    stereo = irfft(rfft(dry) * np.exp(np.array([lead, -lead])), N)
    stereo = signal.sosfilt(signal.butter(3, bass_cut_hz, "high", fs=SR, output="sos"), stereo)
    return signal.sosfilt(signal.ellip(10, .2, 80, top_hz, fs=SR, output="sos"), stereo)


dry = scene()
out = record(dry)
wav_record(out)
```